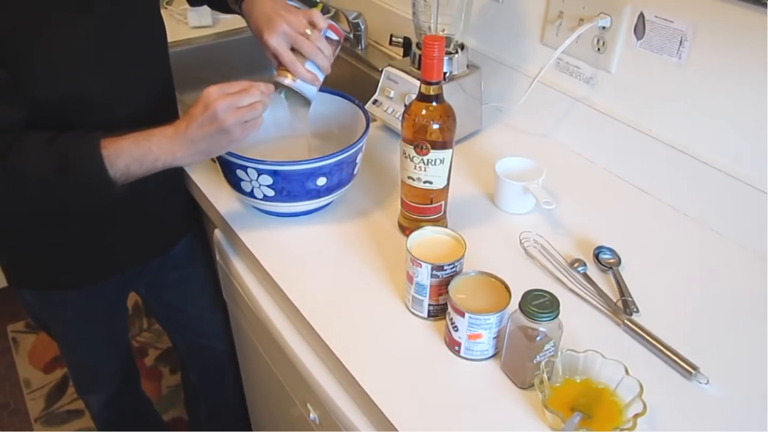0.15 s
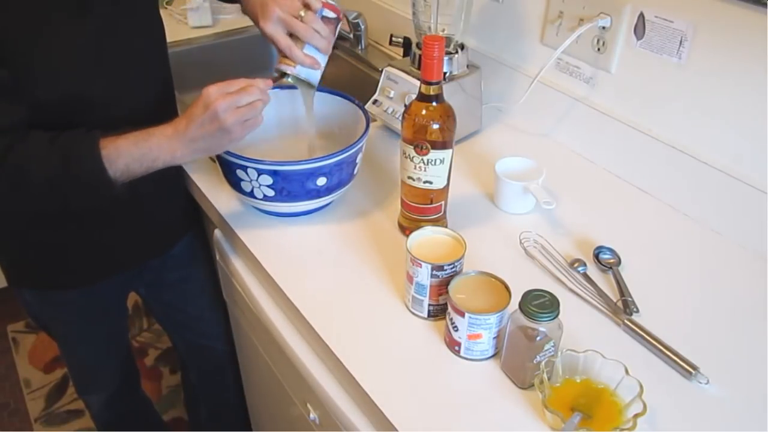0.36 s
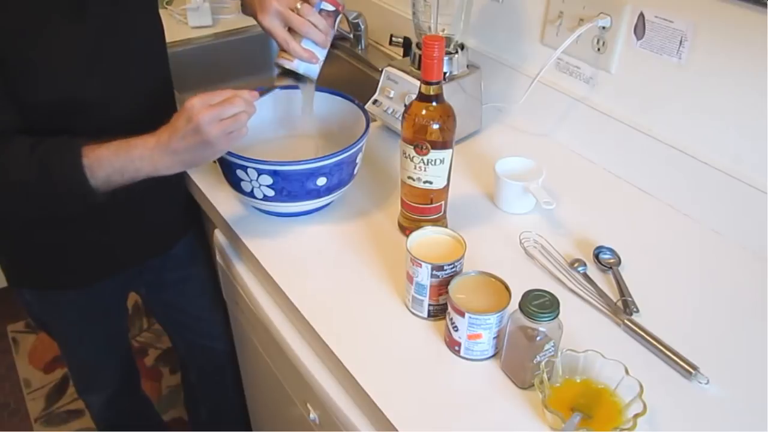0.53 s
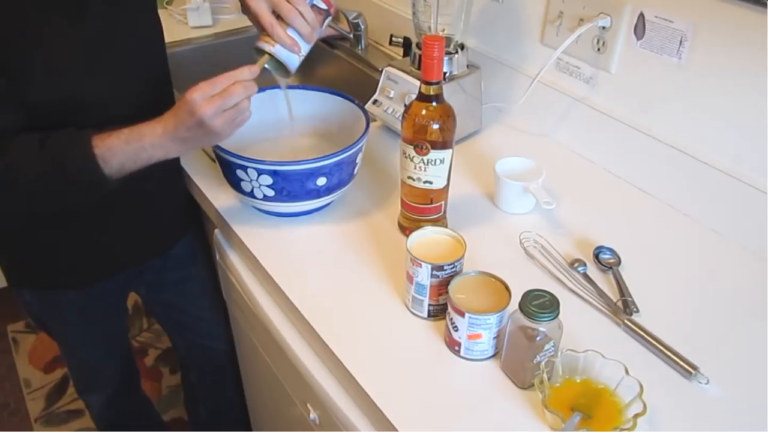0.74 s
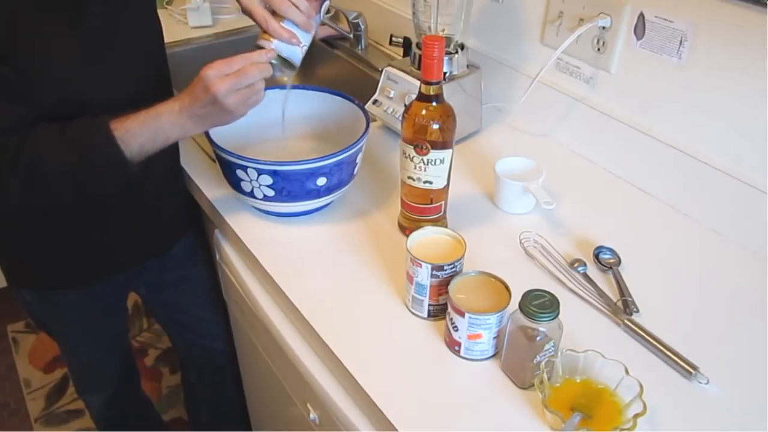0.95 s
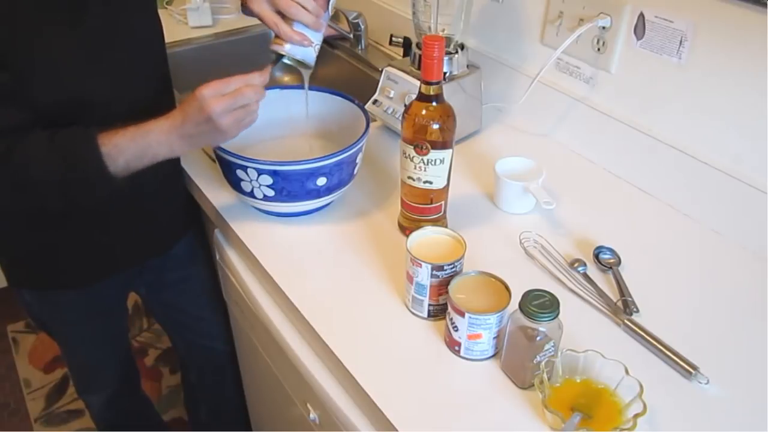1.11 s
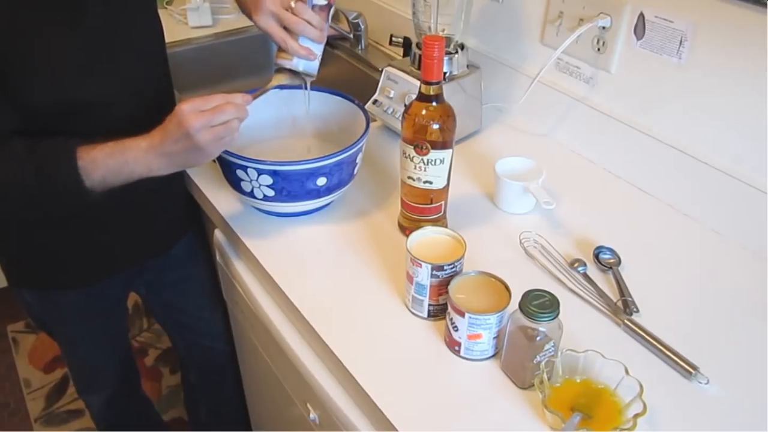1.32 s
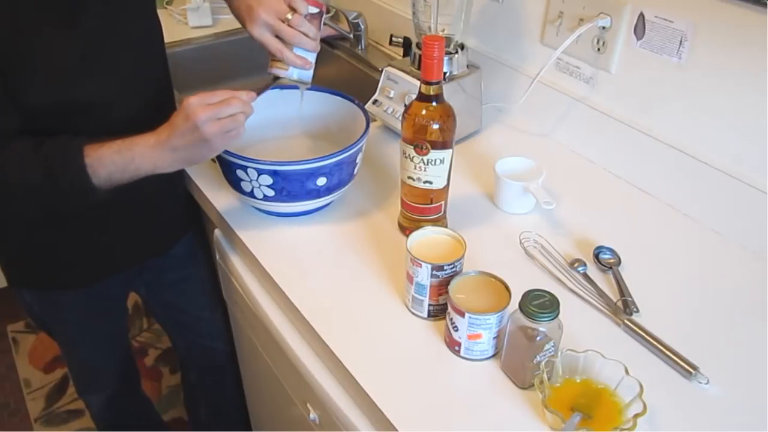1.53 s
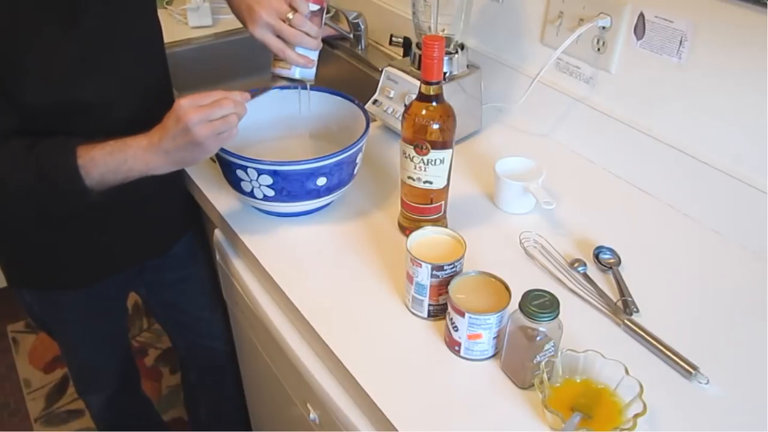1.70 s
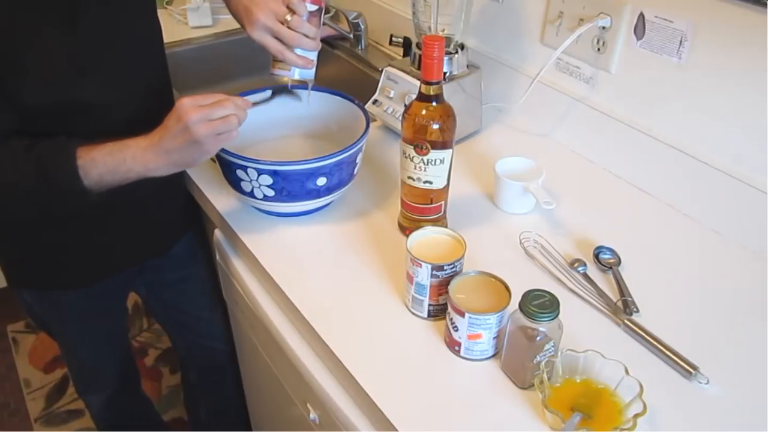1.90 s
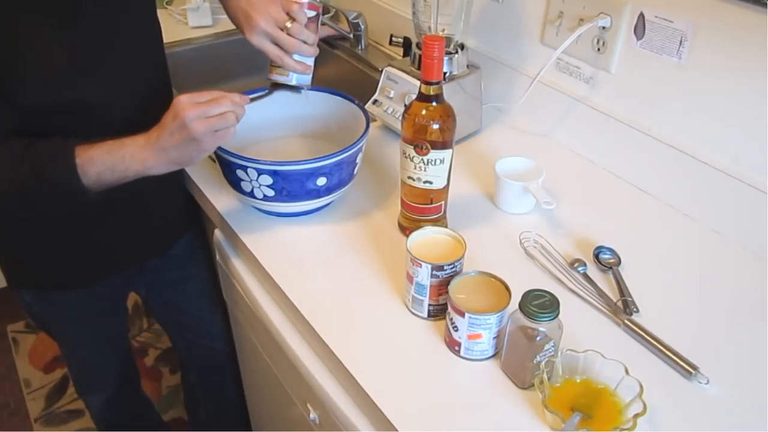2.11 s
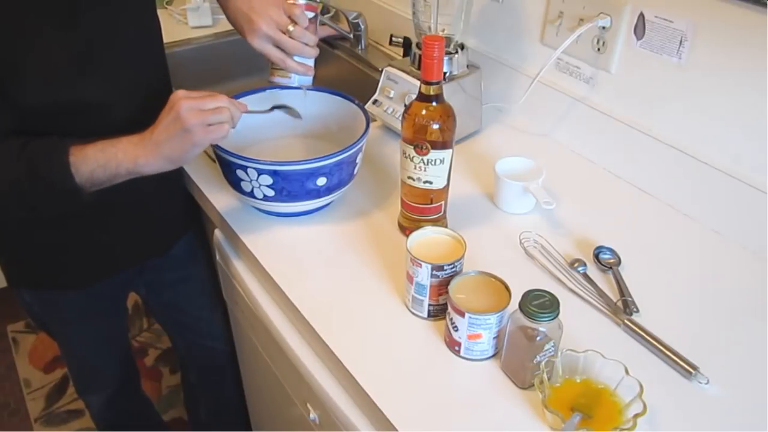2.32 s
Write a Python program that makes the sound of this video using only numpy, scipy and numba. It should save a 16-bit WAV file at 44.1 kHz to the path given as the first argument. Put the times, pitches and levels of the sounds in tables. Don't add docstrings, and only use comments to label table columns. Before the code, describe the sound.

Metal spoon tapping, rattling and scraping inside a hollow tin can in a small kitchen

```python
import sys
import numpy as np
from scipy import signal
from scipy.fft import rfft, irfft
from scipy.io import wavfile
from scipy.ndimage import uniform_filter1d
from numba import njit

SR = 44100
rng = np.random.default_rng(int(sys.argv[2]) if len(sys.argv) > 2 else 0)


def master(y):
    cut = np.clip(np.atleast_2d(y).T, -1, 1)
    pcm = np.round(cut * 32767)
    wavfile.write(sys.argv[1], SR, pcm.astype(np.int16))


def field_ratio(decibels):
    return 10 ** (np.asarray(decibels, dtype=float) / 20)


N = 103635
TOUCH = 8192


def unit(x):
    return x / np.sqrt(np.mean(x ** 2))


def band(x, lo_hz, hi_hz):
    return signal.sosfilt(signal.butter(2, [lo_hz, hi_hz], "band", fs=SR, output="sos"), x)


def lowpass(x, hz):
    return signal.sosfilt(signal.butter(1, hz, fs=SR, output="sos"), x)


def walk(per_s):
    hold = int(SR / per_s)
    steps = np.repeat(rng.standard_normal(N // 40 + 2), hold)[:N]
    return unit(uniform_filter1d(steps, hold))


@njit
def ring(x, hz, bend, t60):
    y, z, turn = np.empty(len(x)), 0j, 0j
    decay = np.exp(-np.log(1000.) / (t60 * SR))
    for i in range(len(x)):
        if i % 32 == 0:
            turn = decay * np.exp(2j * np.pi * hz * bend[i] / SR)
        z = z * turn + x[i] + 1e-18
        y[i] = z.imag
    return y * np.sqrt(2 * (1 - decay * decay))


def swell(t, start, length):
    peak_share, sharpness = 0.56, 0.9
    u = np.clip((t - start) / length, 0, 1) ** (np.log(.5) / np.log(peak_share))
    return np.abs(np.sin(np.pi * u)) ** sharpness


# (frequency [Hz], density [dB per Hz])
HUM_COLOUR = [(24, -13), (40, -2.5), (174, -0.5), (309, -1.5), (417, -6), (3930, -17.5), (7910, -22),
              (8520, -23.5), (15500, -27.5)]


def kitchen(t):
    hum_db, whine_hz, beat_hz, whine_db, fall_db = -54.5, 7867, 29.97, -70, -5
    f = np.arange(N // 2 + 1) * SR / N + 1
    hz, db = np.array(HUM_COLOUR).T
    colour = field_ratio(np.interp(np.log(f), np.log(hz), db))
    hum = irfft(rfft(rng.standard_normal(N)) * colour, N)
    whine = 0
    for k in np.arange(-4.5, 5):
        level = field_ratio(whine_db + fall_db * (abs(k) - 1.0))
        whine = whine + level * np.sin(2 * np.pi * (whine_hz + k * beat_hz) * t + k * k)
    return field_ratio(hum_db) * unit(hum) + whine


def room(x, t):
    level_db, t60_s, top_t60_s, split_hz, gap_s = -3.5, 0.3, 0.17, 4300, 0.0036
    bass_hz, bass_db = 800, -10
    noise = rng.standard_normal(N) * (t > gap_s)
    low = lowpass(noise, split_hz)
    tail = low * field_ratio(-60 * t / t60_s) + (noise - low) * field_ratio(-60 * t / top_t60_s)
    tail = tail - (1 - field_ratio(bass_db)) * lowpass(tail, bass_hz)
    tail = tail / np.sqrt(np.sum(tail ** 2))
    return x + field_ratio(level_db) * signal.fftconvolve(x, tail)[:N]


# (time [s], level [dB])
HAND_SHIFTS = [
    (.43, -51),
    (0.701, -52),
    (1.0, -82),
    (1.409, -48),
    (1.7, -66),
]


def hand(t):
    bump_hz, bump_s = 148, 0.034
    shape = sum(field_ratio(db) * swell(t, start, 2 * bump_s) for start, db in HAND_SHIFTS)
    return shape * unit(band(rng.standard_normal(N), bump_hz * .6, bump_hz * 2.0))


# (time [s], frequency [Hz], level [dB], t60 [s])
SPOT_TOUCHES = [(.053, 5000, -29, 0.0054), (.074, 441, -33, 0.032), (.193, 7940, -26, 0.013),
                (.205, 798, -38.5, .12), (.381, 1047, -29, 0.012), (.394, 1487, -26, 0.0048),
                (.407, 1450, -20.5, 0.0043), (.42, 6150, -28, 0.015), (.504, 1900, -25, 0.0055),
                (.455, 6230, -31, 0.011), (.681, 6330, -36, 0.011), (.682, 1330, -52, 0.13),
                (.783, 5670, -38, 0.083), (.783, 416, -41, 0.076), (.825, 822, -39, 0.12),
                (.943, 10200, -32.5, 0.0017), (.943, 7600, -37, 0.014), (1.135, 1103, -25.5, 0.0083),
                (1.371, 4550, -23.5, 0.0072), (1.417, 1678, -20.5, 0.0085), (1.428, 1480, -37, 0.022),
                (1.329, 12600, -49, .001), (1.372, 1978, -23, 0.026), (1.371, 860, -22.5, 0.041),
                (1.526, 1972, -26.5, 0.074), (1.57, 874, -27, 0.2), (1.765, 872, -35, .15),
                (1.815, 2750, -24, 0.014), (1.83, 1930, -36, 0.018), (1.13, 3900, -41, .015),
                (1.522, 2970, -16.5, .01), (1.795, 1960, -31, 0.015), (1.905, 1414, -42, 0.032)]


def spots(t):
    rub_s, clean_share, clean_below_hz = 0.0061, .2, 2200
    sag = .01
    out, since = np.zeros(N + TOUCH), t[:TOUCH]
    bend = 1 - sag * since / since[-1]
    for start, hz, db, t60 in SPOT_TOUCHES:
        rasp = rng.standard_normal(TOUCH) / 2
        clean = clean_share * (hz < clean_below_hz) * np.sin(2 * np.pi * hz * since)
        push = np.exp(-since / rub_s) * (rasp + clean)
        i = int(start * SR)
        out[i:i + TOUCH] += field_ratio(db) * ring(push, 1. * hz, bend, min(t60, .12))
    return out[:N]


def friction():
    grains_per_s, spread_db, glide_db, patchy_db = 2400, 3.5, -3, 2
    size = field_ratio(spread_db * np.minimum(rng.exponential(size=N), 3)) * np.sign(rng.standard_normal(N))
    clicks = (rng.random(N) < grains_per_s / SR) * size
    glide = field_ratio(glide_db) * rng.standard_normal(N)
    return unit(unit(clicks) + glide) * field_ratio(patchy_db * walk(90))


# (from [Hz], to [Hz], start [s], stop [s], level [dB], t60 [s])
EDGE_SQUEAK = (2590, 2760, .98, 1.2, -36, .06)


def squeak(t, rub):
    hz, end_hz, start, stop, db, t60 = EDGE_SQUEAK
    rise = np.interp(t, [start, stop], [1, end_hz / hz])
    return field_ratio(db) * swell(t, start, stop - start) * np.tanh(unit(ring(rub, 1. * hz, rise, t60)))


# (time [s], hollow [dB], wall [dB], bright [dB])
SPOON_TAPS = [(0.003, -28.5, -41.5, -74), (0.021, -27.5, -45, -65), (0.0541, -69, -42, -44),
              (0.0742, -32, -33.5, -37), (0.1236, -39, -33, -49), (0.193, -30.5, -24.5, -31),
              (0.203, -12, -31, -27), (0.2225, -22, -36.5, -39), (0.2698, -38, -60, -42),
              (0.3536, -25.5, -33.5, -48), (0.381, -32, -32.5, -40), (0.393, -22.5, -29.5, -30.5),
              (0.4062, -16, -25, -45), (.411, -9, -35, -40), (.4185, -18, -25, -33.5),
              (.4255, -25, -25.5, -41), (.443, -17, -27, -37), (.4505, -11, -40, -29),
              (.4595, -24, -29, -40), (.466, -21, -40, -29), (0.5033, -51, -33, -30),
              (0.6276, -37, -49.5, -49), (0.6804, -38.5, -38, -46), (0.7113, -48, -47, -39),
              (0.7826, -41.5, -44.5, -55), (0.8043, -35, -47, -43.5), (0.9428, -59, -42.5, -42),
              (1.0985, -48, -44, -51), (1.109, -21, -46, -58), (1.1187, -28, -40, -38),
              (1.1292, -24.5, -34.5, -34), (1.1368, -27, -30, -24.5), (1.142, -20.5, -36, -44),
              (1.156, -22, -37, -32), (1.172, -38, -30, -52), (1.202, -22.5, -30.5, -40),
              (1.3692, -12, -19, -58), (1.4165, -42, -26.5, -45), (1.5212, -11, -16.5, -19.5),
              (1.5618, -24, -27.5, -33), (1.577, -36, -30.5, -31), (1.59, -40, -25.5, -28.5),
              (1.7635, -14.5, -22, -36), (1.7908, -42, -31.5, -31), (1.822, -28.5, -25.5, -27),
              (1.9041, -23.5, -33, -31), (2.13, -63, -66.5, -57)]
# (start [s], length [s], hollow [dB], wall [dB], bright [dB])
SPOON_SCRAPES = [(0.09, 0.18, -58, -38.5, -47.5), (0.191, 0.12, -31.5, -39, -70),
                 (0.407, 0.071, -14.5, -30, -43), (0.455, 0.097, -47, -43.5, -58),
                 (0.622, 0.041, -53, -67, -50.5), (0.79, 0.15, -38.5, -37, -40),
                 (0.937, 0.051, -51.5, -65, -62), (0.974, 0.15, -48, -41.5, -46.5),
                 (1.088, .11, -24, -30.5, -34.5), (1.157, 0.055, -30, -35, -38),
                 (1.055, 0.039, -38, -50, -62), (1.374, 0.097, -62, -61, -52),
                 (1.55, 0.049, -17, -28.5, -30.5), (1.768, 0.063, -36, -31.5, -62),
                 (1.814, 0.028, -23, -41.5, -50), (1.894, 0.041, -41, -36.5, -40.5)]
# hollow, wall, bright [s]
RATTLE_S = [0.0023, 0.0054, 0.0043]
LOCK_HZ = 567


def spoon(t, rub, part, bend):
    strike_db, rise_s = -9, .0004
    force, since = np.zeros(N + TOUCH), t[:TOUCH]
    age = since / RATTLE_S[part]
    for tap in SPOON_TAPS:
        i, db = int(tap[0] * SR), tap[1 + part]
        rattle = rng.standard_normal(TOUCH)
        shape = 2 * np.exp(-age) * (1 - np.exp(-since / rise_s)) * rattle
        if part == 0:
            pump = np.sin(2 * np.pi * LOCK_HZ * bend[i] * since)
            shape = 0.33 * age * np.exp(1 - age) * pump
        force[i:i + TOUCH] += field_ratio(db) * shape
        force[i] += field_ratio(db + strike_db) * 4
    pressure = sum(field_ratio(row[2 + part]) * swell(t, row[0], row[1]) for row in SPOON_SCRAPES)
    return force[:N] + rub * pressure


def sliding_modes(force, modes):
    contact_db, contact_per_s, wander, wander_per_s = 2.5, 14, .012, 12
    out = 0
    for k, (hz, db, t60) in enumerate(modes):
        push = force * field_ratio(contact_db * walk(contact_per_s))
        bend = 1 + wander * walk(wander_per_s)
        out = out + (-1) ** k * field_ratio(db) * ring(push, 1. * hz, bend, max(t60, .005))
    return out


# (frequency [Hz], level [dB], t60 [s])
HOLLOW_MODES = [(415, -39, 0.088), (493, -15.5, 0.025), (568, 0.5, 0.017), (620, -14, 0.01),
                (781, -8.5, 0.086), (977, -6, 0.03)]
# (frequency [Hz], level [dB re hollow])
KITCHEN_MODES = [(342, -44), (397, -10.5), (440, -14), (478, -19.5), (535, -24), (625, -16.5)]


def hollow(force, bend):
    room_t60_s, steady = .25, np.ones(N)
    out = 0
    for k, (hz, db, t60) in enumerate(HOLLOW_MODES):
        out = out + (-1) ** k * field_ratio(db) * ring(force, 1. * hz, bend, max(t60, .005))
    return out + sum(field_ratio(db) * ring(force, 1. * hz, steady, room_t60_s) for hz, db in KITCHEN_MODES)


# (frequency [Hz], level [dB], t60 [s])
WALL_MODES = [(1060, -19, 0.026), (1450, -38, 0.03), (1740, -36, 0.03), (1900, -39, 0.035),
              (2660, -22, 0.057), (2563, -19, 0.051), (3460, -48, 0.02), (3490, -21.5, 0.025),
              (4430, -19, 0.025), (5220, -32, 0.02)]
# (frequency [Hz], level [dB re wall], t60 [s], share of pitch drift)
BARE_WALL = [
    (856.3, -1, 0.085, 0.77),
    (1978, -6, 0.07, 0),
]


def wall(force, bend, free_db):
    out, freed = sliding_modes(force, WALL_MODES), force * field_ratio(free_db)
    for hz, db, t60, drift in BARE_WALL:
        out = out + field_ratio(db) * ring(freed, 1. * hz, bend ** drift, t60)
    return out


# (frequency [Hz], level [dB], t60 [s])
BRIGHT_MODES = [(5790, -9, 0.049), (6245, -6.5, 0.0084), (7820, -16, 0.0099), (9700, -37, 0.02)]


def bright(force):
    return sliding_modes(force, BRIGHT_MODES)


# (time [s], low pitch [re emptied can], freedom of the wall to ring [dB])
CAN_STATE = [(0, 1.065, -33), (0.201, 0.95, -0.5), (0.409, 0.99, -1.5), (.44, 0.95, -2), (0.489, 0.957, -3),
             (.8, 1.022, 0), (1.2, 1.023, -4), (1.35, 1.001, 1), (1.7, 1.003, -9), (1.861, 0.97, -2.5),
             (1.922, 0.92, -9)]
# (low [Hz], high [Hz], level [dB re modes])
CLATTER_BANDS = [
    (383, 4700, -21),
    (694, 4900, -4),
    (5000, 11600, -6.5),
]


def can(t):
    lock_width_hz, lock_db, loose_db = 35, -11, -13
    rub = friction()
    when, pitch, freedom = np.array(CAN_STATE).T
    bend, free_db = np.interp(t, when, pitch), np.interp(t, when, freedom)
    locked = np.tanh(2 * unit(ring(rub, 1. * LOCK_HZ, bend, 2.2 / lock_width_hz)))
    rubs = [field_ratio(loose_db) * rub + field_ratio(lock_db) * locked, np.roll(rub, 40), np.roll(rub, 80)]
    out = squeak(t, rub)
    for part, (lo_hz, hi_hz, db) in enumerate(CLATTER_BANDS):
        force = band(spoon(t, rubs[part], part, bend), lo_hz, hi_hz)
        if part == 0:
            rung = hollow(force, bend)
        elif part == 1:
            rung = wall(force, bend, free_db)
        else:
            rung = bright(force)
        clatter = field_ratio(db) * force * np.sqrt(SR / 2 / (hi_hz - lo_hz))
        out = out + 0.5 * rung + clatter
    return out


def scene():
    t = np.arange(N) / SR
    played = can(t) + spots(t) + hand(t)
    return (room(played, t) + kitchen(t))[None]


def band_limit(x):
    return signal.sosfilt(signal.butter(12, 16500, fs=SR, output="sos"), x)


def record(dry):
    top_hz = 15700
    mix = signal.sosfilt(signal.ellip(8, .2, 30, top_hz, fs=SR, output="sos"), dry)
    return band_limit(mix)


dry = scene()
out = record(dry)
master(out)
```